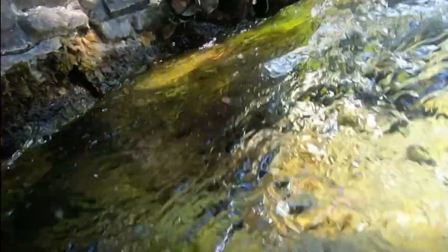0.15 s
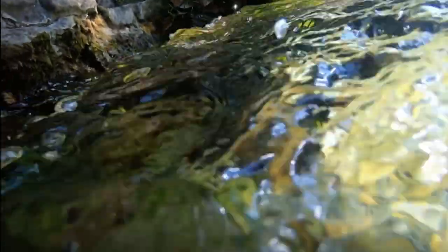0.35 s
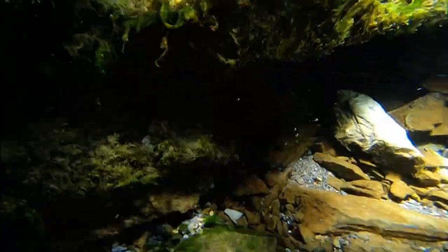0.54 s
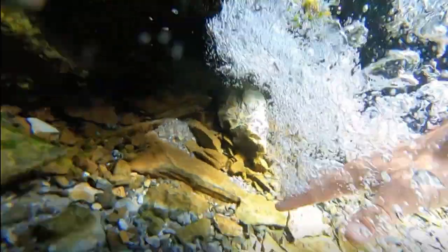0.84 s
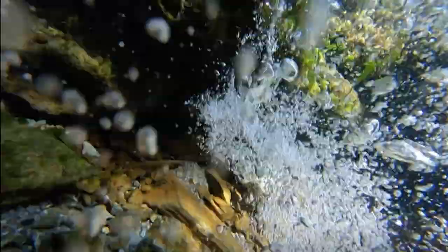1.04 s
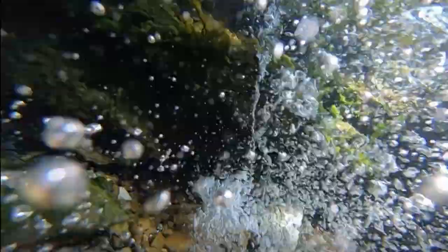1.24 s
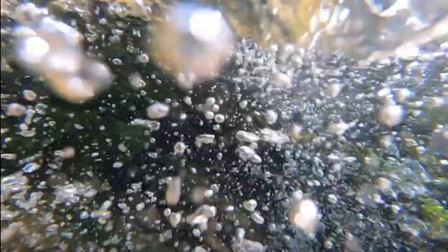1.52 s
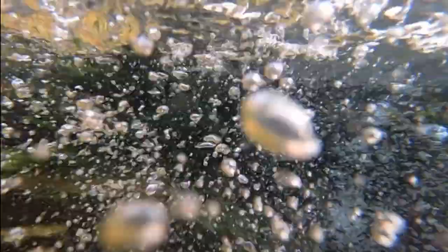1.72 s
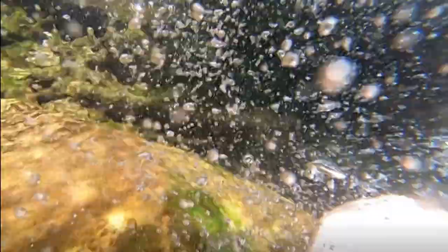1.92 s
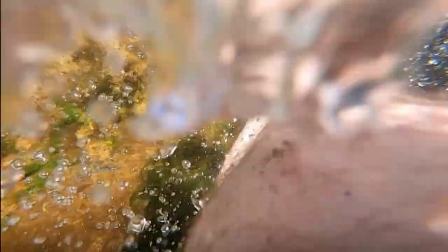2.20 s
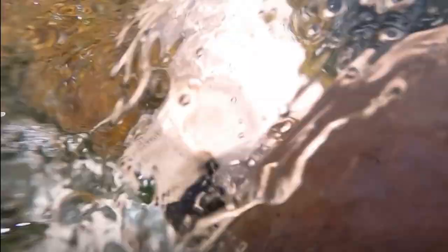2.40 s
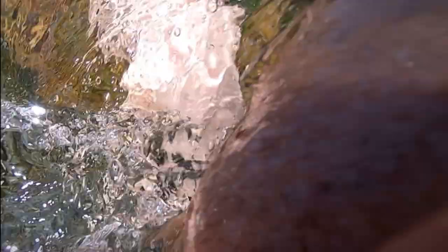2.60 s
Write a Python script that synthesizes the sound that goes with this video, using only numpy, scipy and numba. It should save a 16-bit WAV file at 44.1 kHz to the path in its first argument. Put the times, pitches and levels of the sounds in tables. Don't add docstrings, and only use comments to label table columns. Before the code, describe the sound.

A splash as the microphone plunges into a pool, then muffled underwater gurgling, rumbling and bubbles

```python
import sys
import numpy as np
from scipy import signal
from scipy.fft import rfft, irfft
from scipy.io import wavfile
from scipy.ndimage import uniform_filter1d
from numba import njit

SR = 44100
rng = np.random.default_rng(int(sys.argv[2]) if len(sys.argv) > 2 else 0)


def unload_audio(sound):
    columns = np.transpose(np.atleast_2d(sound))
    steps = np.round(np.clip(columns, -1, 1) * 32767)
    wavfile.write(sys.argv[1], SR, steps.astype(np.int16))


def boost_factor(decibels):
    exponent = np.asarray(decibels, float) / 20
    return 10 ** exponent


N = 121275


def seconds():
    return np.arange(N) / SR


def curve(table):
    t, level = np.array(table, float).T
    return np.interp(seconds(), t, level)


def colour(table, hz):
    f, level = np.array(table, float).T
    return np.interp(np.log(hz), np.log(f), level)


def unit(x):
    return x / np.sqrt(np.mean(x ** 2))


def band(x, lo_hz, hi_hz, order=2):
    return signal.sosfilt(signal.butter(order, [lo_hz, hi_hz], "band", fs=SR, output="sos"), x)


def tinted(table):
    hz = np.maximum(np.fft.rfftfreq(N, 1 / SR), 1)
    return unit(irfft(rfft(rng.standard_normal(N)) * boost_factor(colour(table, hz)), N))


def walk(rate_hz):
    hold = int(SR / rate_hz)
    steps = np.repeat(rng.standard_normal(N // hold + 1), hold)
    return 3.37 * uniform_filter1d(uniform_filter1d(steps, hold), hold)[:N]


@njit
def ring(start, hz, cycles, size, glide, rise):
    out = np.zeros(N)
    for k in range(len(start)):
        life = cycles[k] * SR / hz[k]
        first, phase = int(start[k] * SR), 0.
        for j in range(min(int(2.5 * life), N - first)):
            phase += 2 * np.pi * hz[k] * (1 + glide * (j / life - .3)) / SR
            swell = (1 - np.exp(-j * hz[k] / (rise[k] * SR))) ** 2
            out[first + j] += size[k] * np.sin(phase) * swell * 10 ** (-j / life)
    return out


def listed(table, glide, rise, boost_db, cycles=2.):
    rows = np.array(table, float)
    cycles = rows[:, 3] if rows.shape[1] > 3 else np.full(len(rows), cycles)
    size = boost_factor(rows[:, 1] + boost_db)
    swell_cycles = rise * np.clip(cycles / 8, .2, 2)
    return ring(rows[:, 0], rows[:, 2], np.maximum(cycles, 1), size, glide, swell_cycles)


def swarm(rate, table, cycles, scatter_db):
    u = rng.random((6000, 4))
    s = np.cumsum(-np.log(u[:, 0] + 1e-9)) / rate
    u, s = u[s < N / SR], s[s < N / SR]
    hz = table[0][0] * (table[-1][0] / table[0][0]) ** u[:, 1]
    size = boost_factor(colour(table, hz) - scatter_db * np.log(.03 + u[:, 2])) * hz
    life_cycles = cycles * (0.5 + 1.52 * u[:, 3])
    return unit(ring(s, hz, life_cycles, size, 0.049, np.full(len(hz), 0.9)))


def bursts(table, share):
    t, env = seconds(), np.zeros(N)
    for s, db, length in table:
        late = np.maximum(t - s + 0.0013, 0) / (share * max(length, .003) / 4)
        env += boost_factor(db) * (late / 2) ** 2 * np.exp(2 - late)
    return env


# [t/s, level/dB]
SPRAY_LEVEL = [
    (0, -34),
    (.38, -39),
    (.45, -36),
    (.48, -36.5),
    (.53, -25.5),
    (.59, -40),
    (.66, -41),
    (.77, -38.5),
    (.83, -50.5),
    (1.0, -57.5),
]
# [f/Hz, level/dB per Hz]
SPRAY_COLOUR = [(250, -26), (366, 1), (995, -2), (2620, -6.5), (3500, -18), (4600, -26.5), (9230, -33),
                (15500, -48)]
# [t/s, peak level/dB, length/s]
SLAPS = [(.165, -15.5, 0.0042), (.308, -32, 0.014), (.395, -29.5, .006), (.206, -20, 0.011),
         (.217, -22, 0.01), (.231, -14, 0.01), (.243, -13, 0.012), (.34, -27.5, 0.017), (.405, -23.5, 0.03),
         (.429, -8.5, 0.004), (.459, -15, 0.0081), (.521, -19.5, 0.044)]


def spray():
    drops = swarm(2000, SPRAY_COLOUR, cycles=12, scatter_db=1.8)
    mix = unit(drops + tinted(SPRAY_COLOUR))
    t = seconds()
    treble_db = np.interp(t, [.16, .435, .46, .52, .6], [7, 11.5, -2.5, -6.5, -19.5])
    fade = np.clip((SPRAY_LEVEL[-1][0] - t) / 0.056, 0, 1)
    steady = boost_factor(curve(SPRAY_LEVEL) + 4.5 + 0.76 * walk(40)) * fade
    flare = bursts(SLAPS, 0.63)
    low = band(mix, 150, 1550, order=3) * (steady * boost_factor(-.3 * treble_db) + boost_factor(-7.5) * flare)
    middle = band(mix, 1604, 3700, order=3) * (steady + flare)
    high = band(mix, 3800, 20000, order=4) * boost_factor(treble_db) * (steady + boost_factor(0.5) * flare)
    return low + middle + high


# [t/s, level/dB]
CHURN = [(0, -30), (.4, -45), (.45, -25), (.6, -34.5), (.7, -25), (.82, -27.5), (.95, -29.5), (1.13, -25.5),
         (1.22, -33.5), (1.35, -27.5), (1.5, -44.5), (1.75, -33), (2.1, -29), (2.16, -37), (2.3, -35.5),
         (2.45, -39.5), (2.53, -35), (2.75, -49)]
# [f/Hz, level/dB per Hz]
CLOUD_COLOUR = [(71, -27.5), (120, -7), (210, -9.5), (244, -6), (274, -7.5), (828, -16), (1310, -33.5),
                (2500, -54), (3250, -92.5), (5500, -120)]


def cloud():
    bubbles = swarm(900, CLOUD_COLOUR, cycles=13, scatter_db=2.4)
    mix = band(bubbles + boost_factor(-6) * tinted(CLOUD_COLOUR), 90, 1400, order=5)
    thin = 0.93 * np.exp(-((seconds() - 0.88) / 0.42) ** 2)
    mix = mix - thin * band(mix, 330, 950, order=1)
    return unit(mix) * boost_factor(curve(CHURN) + 1 + 0.99 * walk(21.133))


# [t/s, level/dB]
SURGE = [(0, -47), (.17, -31), (.39, -46.5), (.43, -16.5), (.55, -1), (.6, -27), (.68, -11), (.82, -28.5),
         (1.22, -21), (1.27, -12), (1.6, -18), (1.95, -27), (2.2, -12.5), (2.34, -18), (2.52, -33),
         (2.75, -38.5)]
# [t/s, peak level/dB, f/Hz]
HEAVES = [(0.417, -11.5, 46.2), (0.473, -20, 78.6), (0.509, -4.5, 77.6), (0.678, -34, 45),
          (1.147, -19.5, 112), (1.517, -25, 59.6), (1.798, -9, 57.6), (2.035, -9.5, 71.8),
          (2.148, -26.5, 60), (2.191, -8, 96), (2.271, -20, 59), (2.311, -8.5, 100.8), (2.428, -12, 45.4)]


def surge():
    centre_hz, width_hz = 65.3, 79
    flow = unit(band(rng.standard_normal(N), centre_hz - width_hz / 2, centre_hz + width_hz / 2))
    heaves = listed(HEAVES, glide=0., rise=0.26, boost_db=0.54, cycles=2.8)
    return flow * boost_factor(curve(SURGE) - 5.5 + walk(22)) + heaves


# [t/s, peak level/dB, f/Hz, life/cycles]
PINGS = [(.164, -16, 3200, 9), (.231, -7, 3600, 17), (.301, -23.5, 693, 26), (.394, -12, 910, 3),
         (.429, -4.5, 1800, 3.3), (.432, -8, 3200, 20), (.583, -13, 1075, 12), (.666, -11, 506, 5),
         (.772, -21, 1035, 34), (.832, -35.5, 2300, 38), (.94, -39.5, 2050, 25), (1.08, -23, 1294, 16.4),
         (1.139, -39.5, 2030, 30), (1.213, -46, 1830, 18), (1.272, -47, 2420, 26), (1.28, -44.5, 2770, 29),
         (1.279, -23, 1490, 8), (1.488, -41.5, 1905, 22), (1.592, -29, 1890, 5.5), (1.702, -19.5, 814, 4.7),
         (1.701, -31, 2100, 7.4), (1.727, -30.5, 1760, 7.9), (1.729, -37.5, 2530, 17.5),
         (1.958, -12.5, 575, 6.3), (2.09, -42, 1530, 40), (2.192, -22, 1276, 8), (2.218, -17.5, 1410, 25),
         (2.245, -32.5, 1680, 11), (2.273, -41.5, 3400, 28), (2.313, -22, 1035, 5.4),
         (2.335, -37, 3060, 32), (2.357, -38, 1680, 12), (2.375, -15.5, 554, 8), (2.405, -39.5, 2600, 45),
         (2.44, -25, 1196, 8.9), (2.4955, -18.5, 1310, 7.5), (2.495, -16, 733, 4), (2.54, -26.5, 1430, 8),
         (2.565, -22, 1600, 8.3), (2.598, -22, 503, 3.8), (2.655, -32.5, 1220, 9.9)]


def pings():
    return listed(PINGS, glide=0.019, rise=1.5, boost_db=2.4)


# [t/s, peak level/dB, f/Hz, life/cycles]
BUBBLES = [(.216, -10, 782, 2.3), (.243, -16.5, 1606, 23), (.426, -10.5, 581, 7.3), (.447, 2, 900, 1.3),
           (.458, -2.5, 896, 3.9), (.466, -4, 1100, 4.3), (.503, -1.5, 500, 0.92), (.522, -6, 1318, 14),
           (.55, -2.5, 612, 10.1), (.632, -13, 900, 5.1), (.692, -20, 637, 58), (.732, -9, 566, 16),
           (.74, -20, 1045, 24), (.805, -18, 1042, 23), (1.013, -24, 826, 40), (1.102, -26.5, 514, 35),
           (1.306, -19, 561, 9.4), (1.399, -22.5, 603, 12), (1.452, -30, 1387, 19), (1.945, -23, 589, 35),
           (1.977, -26.5, 1373, 14), (2.212, -7, 800, 0.93), (2.228, -4.5, 640, 1.06),
           (2.367, -18, 793, 1.3)]


def single_bubbles():
    return listed(BUBBLES, glide=0.02, rise=0.56, boost_db=4.1)


# [t/s, peak level/dB, f/Hz, life/cycles]
GULPS = [(0.234, -9, 159, 2.4), (0.482, -9.5, 157.2, 2.4), (0.534, -1, 165.2, 6.3), (0.552, 6.5, 201, 5.5),
         (0.639, -12, 198, 13.6), (0.717, -2, 151, 3), (0.779, -14, 200.8, 7.6), (1.009, -14, 175.4, 3.8),
         (1.142, -13, 172.4, 4.3), (1.184, -16, 169, 5.2), (1.247, -11, 109, 3.9), (1.27, -7, 149.8, 2.8),
         (1.293, -4, 162.5, 2.3), (1.32, -3, 190.5, 5.3), (1.358, -18, 210.3, 14),
         (1.388, -7.5, 123.5, 1.6), (1.455, -3.5, 167, 4.4), (2.227, -9, 288, 2.35),
         (2.379, -12, 159.5, 1.8), (2.398, -10.5, 179.5, 2.8), (2.47, -9, 281, 3.74)]


def gulps():
    return listed(GULPS, glide=0.013, rise=1.0, boost_db=5.36)


# [t/s, peak level/dB, length/s]
TICKS = [(0.691, -32, .03), (0.755, -30, 0.011), (0.773, -40, 0.011), (0.819, -43, 0.0073),
         (0.883, -34.5, .01), (0.949, -43.5, 0.013), (1.075, -45, 0.03), (1.14, -51, 0.018),
         (1.268, -35, 0.011), (1.278, -30, 0.012), (1.298, -39.5, 0.019), (1.344, -31.5, 0.013),
         (1.353, -40, .06), (1.395, -43.5, .015), (1.415, -45, 0.0054), (1.589, -39.5, 0.016),
         (1.61, -49.5, 0.033), (1.653, -37, 0.0047), (1.703, -37.5, 0.005), (1.727, -35.5, 0.0078),
         (1.984, -44, 0.0085), (2.173, -35.5, .008), (2.189, -22.5, 0.014), (2.196, -38, 0.054),
         (2.234, -39, 0.026), (2.263, -40, 0.0044), (2.273, -41, 0.0099), (2.331, -38.5, 0.021),
         (2.357, -35, 0.016), (2.369, -43, 0.052), (2.401, -29.5, 0.0046), (2.433, -39, 0.056),
         (2.46, -40.5, 0.018), (2.495, -33.5, 0.0095), (2.54, -37.5, 0.012), (2.563, -35, 0.0037),
         (2.604, -49.5, 0.0091)]
# [f/Hz, level/dB per Hz]
FIZZ_COLOUR = [(700, -0.5), (1600, 0.5), (3500, -18.5), (5200, -29), (8000, -33.5)]
HOUSING_HZ = [1374, 1800, 2600, 3340, 3600, 4900]


def ticks():
    s, db, length = np.array(TICKS, float).T[:, :, None]
    u = rng.random((len(TICKS), 8, 4)).transpose(2, 0, 1)
    note = (u[0] * len(HOUSING_HZ)).astype(int)
    hz = np.array(HOUSING_HZ)[note] * (1 + .08 * (u[3] - u[2]))
    size = boost_factor(db + colour(FIZZ_COLOUR, hz) + 20 * np.log10(hz / 1000) - 12 * u[2] - 6.0)
    start, cycles = s - .003 + length * u[1], 26 * (.3 + u[3])
    fizz = ring(start.ravel(), hz.ravel(), cycles.ravel(), size.ravel(), .01, np.full(hz.size, 5.))
    rasp = tinted([(300, -19.0)] + FIZZ_COLOUR + [(12000, -62.5)])
    notes = sum(boost_factor(7 + 1.5 * walk(45)) * band(rasp, .955 * f, 1.045 * f) for f in HOUSING_HZ)
    rasp = unit(rasp + notes)
    wash = boost_factor(-59 + walk(20.0)) * (seconds() > 2.17)
    return fizz + rasp * (boost_factor(-1) * bursts(TICKS, share=.5) + wash)


def scene():
    mix = spray() + cloud() + surge() + pings() + single_bubbles() + gulps() + ticks()
    fade = np.minimum((N - np.arange(N)) / SR / 0.01, 1)
    return (mix * fade)[None]


def top_cut(x):
    return signal.sosfilt(signal.butter(12, 15720, fs=SR, output="sos"), x)


def record(dry):
    low = signal.sosfiltfilt(signal.butter(8, 10800, fs=SR, output="sos"), dry)
    wet = low + boost_factor(-15) * (dry - low)
    return top_cut(np.tanh(wet))


dry = scene()
out = record(dry)
unload_audio(out)
```